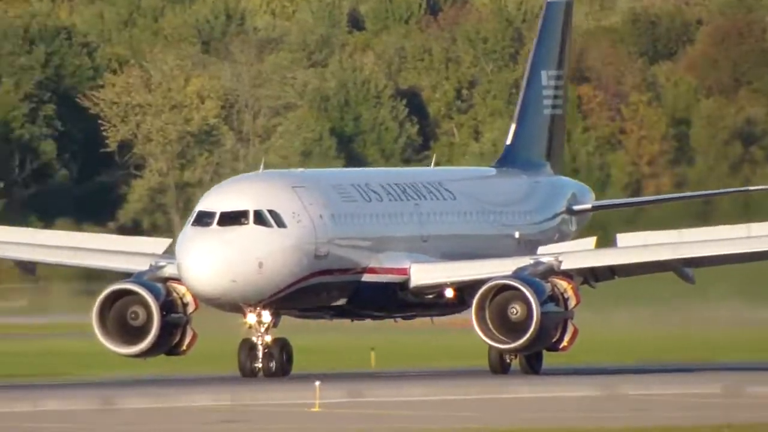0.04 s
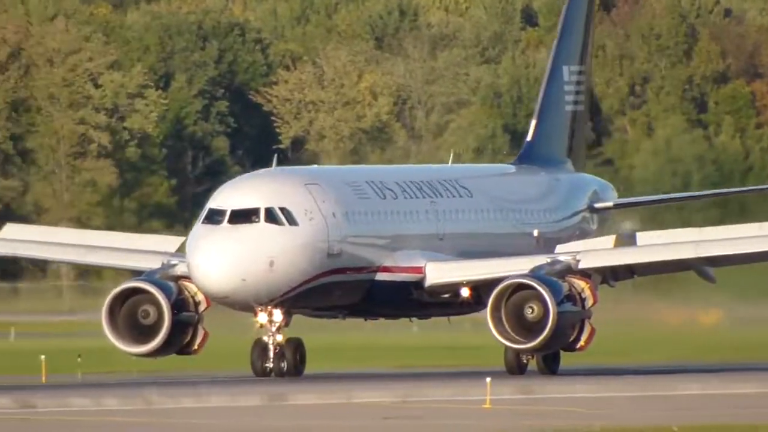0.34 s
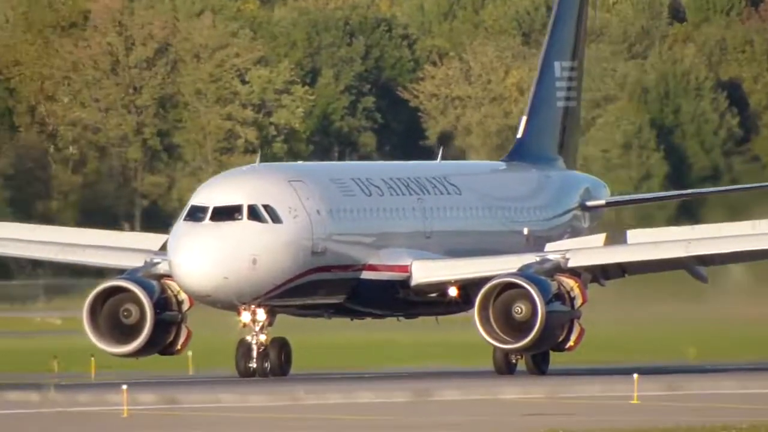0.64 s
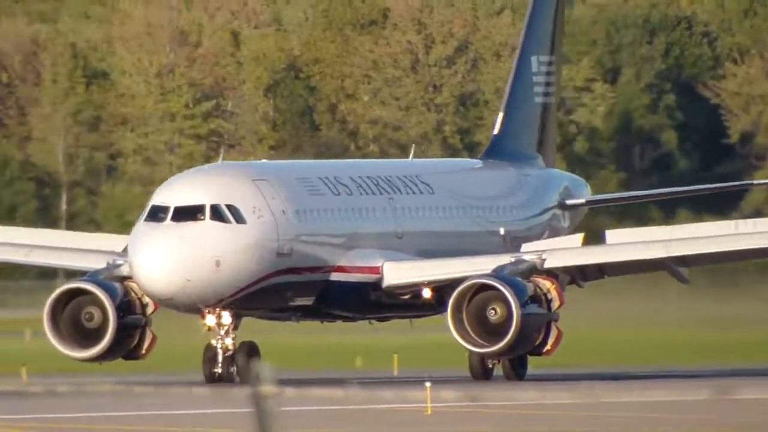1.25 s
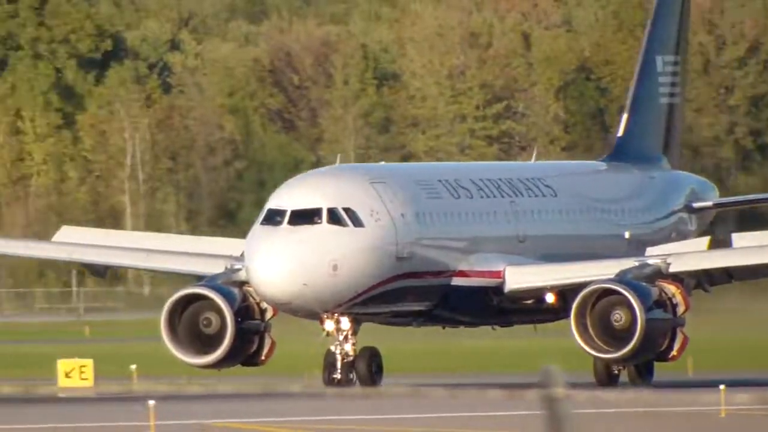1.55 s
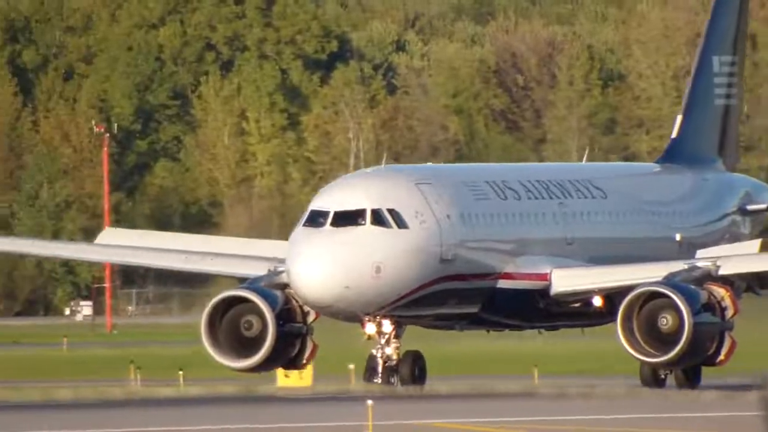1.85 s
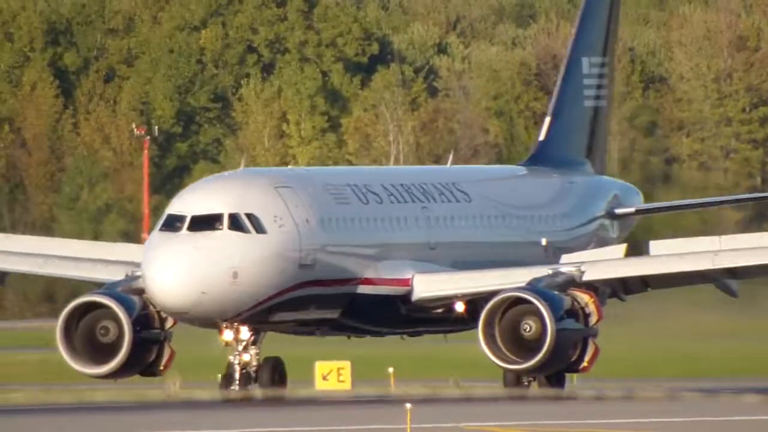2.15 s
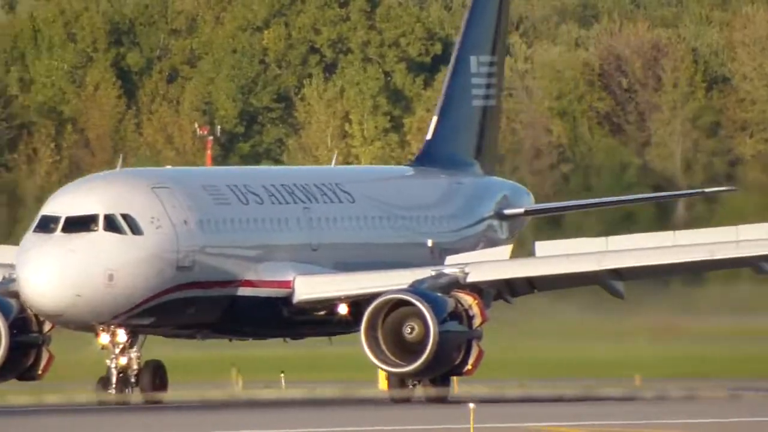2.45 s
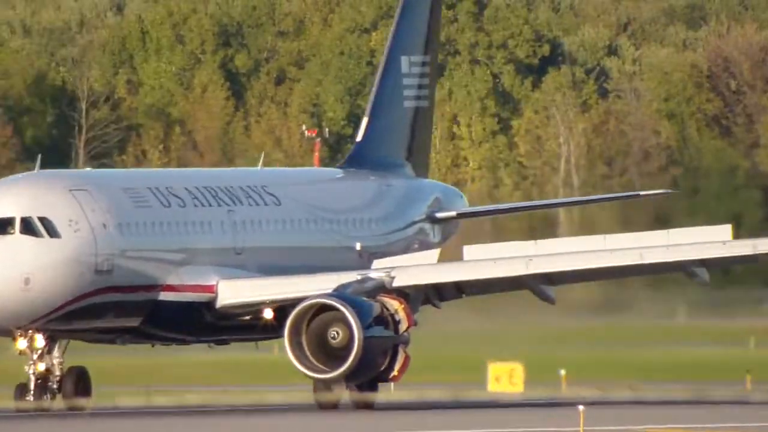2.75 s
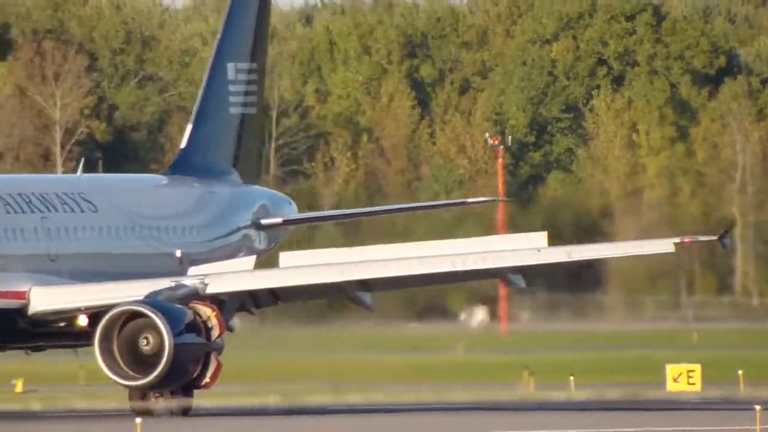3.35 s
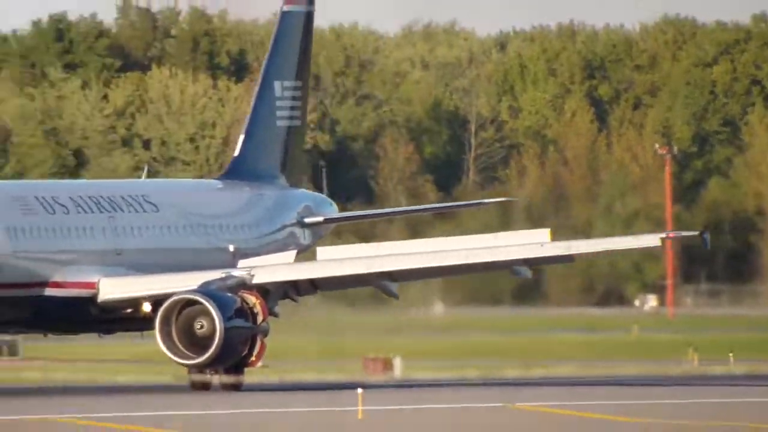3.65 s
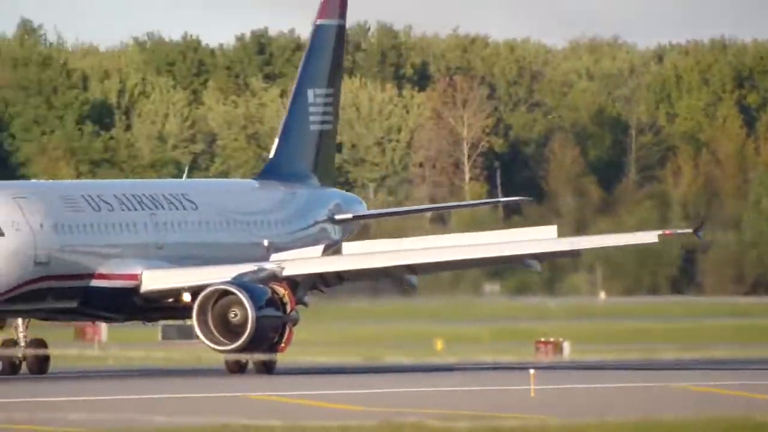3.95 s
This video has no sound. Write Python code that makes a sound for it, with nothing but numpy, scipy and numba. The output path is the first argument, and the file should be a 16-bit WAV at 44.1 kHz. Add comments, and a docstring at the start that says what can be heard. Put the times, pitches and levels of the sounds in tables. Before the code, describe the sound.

A jet airliner roars in reverse thrust as it rolls along a runway, with a surging low rumble and a faint wavering whine. The roar grows fuller and brighter as the plane draws level with the microphone.

```python
"""A jet rolls past after landing, its thrust reversers open to throw the exhaust forward.
From the start, big swirls of exhaust make a surging low rumble under the broad roar of mixing air,
and a faint fan whine drifts in and out. A limiter turns the whole sound down on each loud surge.
Near 2.7 s the jet draws level: the roar grows fuller and brighter, and one brief high zip crosses
from left to right. Toward the end, a fine high spray of noise points at the listener."""
import sys
import numpy as np
from scipy import signal
from scipy.fft import rfft, irfft, next_fast_len
from scipy.io import wavfile
from scipy.ndimage import uniform_filter1d, map_coordinates
from numba import njit

SR = 44100
rng = np.random.default_rng(int(sys.argv[2]) if len(sys.argv) > 2 else 0)


def materialize(psi):
    """Save the field psi as 16-bit PCM at rate SR to the path in sys.argv[1].

    A 1-D psi becomes a single channel; in a 2-D psi each row is a channel.
    """
    bounded = np.clip(np.atleast_2d(psi).T, -1, 1)
    quanta = np.round(bounded * 32767).astype(np.int16)
    wavfile.write(sys.argv[1], SR, quanta)


N = 176400  # 4 seconds

# the surges of the rumble (time [s], level [dB])
RUMBLE_SURGES = [(0.0, -19.5), (0.11, -14), (0.28, -15.5), (0.34, -11.5), (0.38, -21), (0.48, -12.5),
                 (0.54, -21), (0.67, -12.5), (0.9, -21.5), (0.96, -14), (1.23, -19), (1.29, -11.5),
                 (1.56, -17.5), (1.64, -7.5), (1.7, -19), (1.82, -11), (2.21, -17.5), (2.27, -8),
                 (2.36, -18.5), (2.61, -10), (2.66, -17.5), (2.73, -11.5), (2.78, -19.5), (2.95, -8.5),
                 (3.01, -16), (3.09, -6.5), (3.15, -24), (3.33, -9), (3.44, -17.5), (3.76, -16.5),
                 (3.91, -10), (3.99, -15.5)]
# how strong the rumble is at each pitch (frequency [Hz], level [dB])
RUMBLE_COLOUR = [(12, -33), (25, -14), (42, -10.5), (68, -4), (85, 1.5), (105, -3), (150, -17.5),
                 (230, -33), (400, -76)]
# the roar heard from the front (frequency [Hz], level [dB])
ROAR_FRONT_COLOUR = [(60, -9.5), (150, -2.5), (260, -1), (380, -5.5), (560, 0), (690, .5), (860, -2),
                     (1020, 0), (1500, -4), (1800, -10), (2030, -7.5), (2300, -13.5), (2650, -12.5),
                     (3100, -20), (3600, -25), (4400, -35), (5300, -43), (7500, -89)]
# the roar heard from the side (frequency [Hz], level [dB])
ROAR_SIDE_COLOUR = [(60, -10), (150, 5), (250, -1), (360, -3.5), (520, -3), (700, 1.5), (850, -7),
                    (990, 1.5), (1170, -5), (1500, -3.5), (1800, -8), (2080, -5.5), (2370, -15),
                    (2680, -9.5), (3050, -17.5), (3500, -19), (4300, -29.5), (5300, -41.5), (7500, -63)]
# the slow rise of the roar (time [s], level [dB])
ROAR_LOUDNESS = [(0, -25), (.25, -23.5), (.55, -24), (.7, -24), (.85, -22.5), (1.05, -22.5), (1.2, -22),
                 (1.4, -22), (1.55, -21), (1.75, -21), (1.95, -22), (2.18, -21), (2.4, -21.8), (2.62, -21),
                 (2.85, -19), (3.2, -20), (3.65, -19.5), (4, -20.5)]
# the deep part of the exhaust (frequency [Hz], level [dB])
BODY_COLOUR = [(70, -11), (135, -0.5), (205, -1.5), (245, -4.5), (300, -3), (420, -11), (600, -21),
               (1200, -70)]
# how that deep part fades and returns (time [s], level [dB])
BODY_LOUDNESS = [(0, -32.5), (.55, -30), (1, -53), (1.9, -41), (2.4, -28.5), (2.9, -30.5), (3.45, -26.5),
                 (4, -26.5)]
# how the fan whine comes and goes (time [s], level [dB])
WHINE_LOUDNESS = [(0, -56), (.25, -41), (.58, -43), (.8, -49), (1.1, -44), (1.5, -41), (1.95, -46),
                  (2.15, -37.5), (2.45, -40), (2.6, -50), (2.85, -40), (3.1, -47), (4, -55)]
# the highest part of the exhaust (frequency [Hz], level [dB])
SPRAY_COLOUR = [(1500, -32), (2600, -5), (3400, -0.5), (4400, -7), (5400, -19), (7500, -33), (10000, -51)]
# the filter that makes the zip sharp (frequency [Hz], gain [dB])
ZIP_COLOUR = [(2000, -30), (4500, 5.5)]
# the steady hiss (frequency [Hz], level [dB])
HISS_COLOUR = [(3000, -12), (6000, -.5), (10000, -4), (15000, -6.5)]
# how alike left and right are, for the jet and for the hiss (frequency [Hz], likeness [0 to 1])
JET_LIKENESS = [(25, 0.94), (100, 0.99), (1000, .993), (2500, .97), (4500, 1)]
HISS_LIKENESS = [(1000, 0.055)]

ROAR_LEFT_DB = 1.5  # how much louder the jet is on the left, rumble aside


def rumble():
    """Big swirls of reversed exhaust make a low noise, evened out here and then swelled in surges."""
    swirls = stereo_noise(RUMBLE_COLOUR, JET_LIKENESS, patchy_db=0)
    power = uniform_filter1d(swirls[0] ** 2, size=SR // 10)  # averaged over 0.1 s
    even = unit(swirls / np.sqrt(np.abs(power) + 1e-6))
    return even * amp(curve(RUMBLE_SURGES) - .5) * lean(left_db=3)


def roar():
    """Exhaust roars as it mixes with air. We hear it from the front, then from the side."""
    passing_s, turn_s = 2.69, 0.38
    side_share = .5 + .5 * np.tanh((clock() - passing_s) / (2 * turn_s))
    front = stereo_noise(ROAR_FRONT_COLOUR, JET_LIKENESS, patchy_db=0.87)
    side = stereo_noise(ROAR_SIDE_COLOUR, JET_LIKENESS, patchy_db=1.87) * amp(0.58)
    blend = np.sqrt(1 - side_share) * front + np.sqrt(side_share) * side
    flutter_db = 0.65 * wobble(per_second=22)  # rough air on the way
    return blend * amp(curve(ROAR_LOUDNESS) + flutter_db) * lean(ROAR_LEFT_DB)


def exhaust_body():
    """The deep part of the exhaust noise fades early on, then fills in as the jet draws level."""
    noise = stereo_noise(BODY_COLOUR, JET_LIKENESS, patchy_db=-0.2)
    return noise * amp(curve(BODY_LOUDNESS)) * lean(ROAR_LEFT_DB)


def fan_whine():
    """The fan blades make a tone, blurred by the air, that sinks slowly as the jet goes by."""
    start_hz, fall_hz_per_s = 2431, 16
    phase = 2 * np.pi * np.cumsum(start_hz - fall_hz_per_s * clock()) / SR
    blur = wobble(per_second=35) * np.cos(phase) + wobble(per_second=35) * np.sin(phase)
    tone = np.cos(phase) + 0.77 * blur
    return unit(tone) * amp(curve(WHINE_LOUDNESS)) * lean(ROAR_LEFT_DB)


def exhaust_spray():
    """The highest jet noise beams sideways, so it is heard once the open reversers face us."""
    beam = bell_curve(clock() - 3.84, width_s=0.53)  # strongest at 3.84 s
    noise = stereo_noise(SPRAY_COLOUR, JET_LIKENESS, patchy_db=3.0)
    return noise * amp(-42.5) * beam * lean(ROAR_LEFT_DB)


def high_zip():
    """A brief run of sharp ticks slows down and slips from left to right."""
    middle_s, width_s, left_lead_s = 2.764, .008, .009
    t = clock() - middle_s
    ticks_per_s = np.interp(t, [-width_s, -width_s / 2], [1210, 942])
    ticks = np.diff(np.floor(np.cumsum(ticks_per_s) / SR), prepend=0)
    noisy = ticks + 0.056 * rng.standard_normal(N)
    sharp = filtered(noisy, lambda hz: amp(along(ZIP_COLOUR, hz)))
    swell = bell_curve(t + np.array([[.5], [-.5]]) * left_lead_s, width_s)
    return sharp * swell * amp([[-19], [-26]])  # weaker on the right


def hiss():
    """The microphone adds a faint hiss of its own."""
    return stereo_noise(HISS_COLOUR, HISS_LIKENESS, patchy_db=2.5) * amp(-56.5) * lean(left_db=-0.5)


def stereo_noise(colour, likeness, patchy_db):
    """Left and right noise of a given colour, with random louder and softer patches."""
    grid = signal.stft(rng.standard_normal((2, N)), nperseg=1024)[2]  # split by pitch and time
    patches = uniform_filter1d(rng.standard_normal(grid.shape[1:]), size=10, axis=0)
    patches = uniform_filter1d(patches, size=9, axis=1)
    pair = signal.istft(grid * amp(patchy_db * unit(patches)), nperseg=1024)[1][:, :N]

    def gains(hz):
        angle = np.arccos(np.clip(along(likeness, hz), -1, 1)) / 2  # 0 when both sides match
        return amp(along(colour, hz)) * [np.cos(angle), np.sin(angle)]

    shared, opposite = filtered(pair, gains)
    return unit(np.array([shared + opposite, shared - opposite]))


def amp(db):
    """Turn decibels into a number to multiply by."""
    return 10 ** (np.asarray(db) / 20)


def unit(x):
    """Scale a sound to an average power of 1."""
    return x / np.sqrt(np.mean(x ** 2) + 1e-20)


def clock():
    """The time of each sample, in seconds."""
    return np.arange(N) / SR


def along(points, hz):
    """Read a frequency table, joining its points on a log (pitch) scale."""
    frequencies, values = np.transpose(points)
    return np.interp(np.log(hz + 1), np.log(frequencies + 1), values)


def curve(rows):
    """Read a time table at every sample."""
    return np.interp(clock(), *np.transpose(rows))


def bell_curve(t, width_s):
    """A smooth rise and fall that peaks at t = 0."""
    return np.exp(-.5 * (t / width_s) ** 2)


def wobble(per_second):
    """A smooth curve through evenly spaced random values."""
    return map_coordinates(rng.standard_normal(N // 10), [clock() * per_second + 2])


def filtered(x, gain_at):
    """Turn each frequency of a sound up or down."""
    size = next_fast_len(N + SR // 2)
    return irfft(rfft(x, size) * gain_at(np.fft.rfftfreq(size, 1 / SR)), size)[..., :N]


def lean(left_db):
    """Two gains that put the left side left_db above the right."""
    return amp(np.array([[.5], [-.5]]) * left_db)


@njit
def follow(need, attack, release):
    """Rise quickly to each peak and sink back slowly."""
    out, held = np.zeros(len(need)), 0.
    for i in range(len(need)):
        held += (need[i] - held) * (attack if need[i] > held else release)
        out[i] = held
    return out


def scene():
    """The jet, the zip and the hiss together."""
    return rumble() + exhaust_body() + roar() + exhaust_spray() + fan_whine() + high_zip() + hiss()


def record(dry):
    """A fast limiter turns both sides down on loud peaks; the very highest treble is cut off."""
    limit_db, cut_share, attack_s, release_s = -11.5, 0.78, 0.0019, 0.033
    step, top_hz = SR // 2000, 15800  # the gain changes in steps of about 0.5 ms
    peak_db = 20 * np.log10(np.abs(dry).max(axis=0) + 1e-9)
    over_db = np.maximum(peak_db - limit_db, 0)
    cut_db = cut_share * follow(over_db, 1 / (attack_s * SR), 1 / (release_s * SR))
    stepped_db = cut_db[np.arange(N) // step * step]
    return filtered(dry * amp(-stepped_db), lambda hz: hz < top_hz)


dry = scene()
out = record(dry)
materialize(out)
```